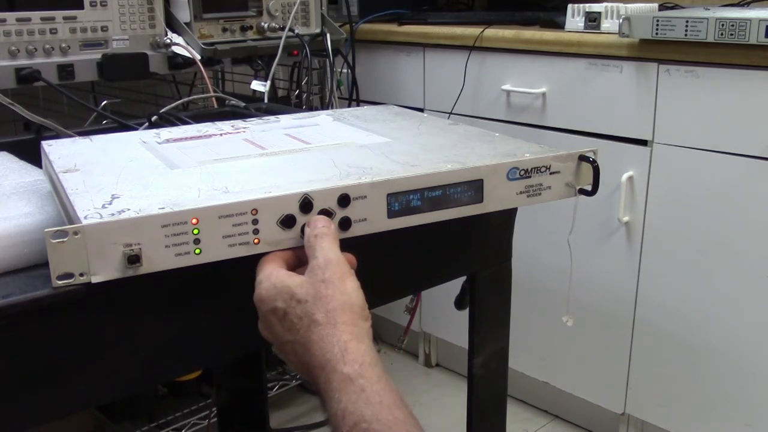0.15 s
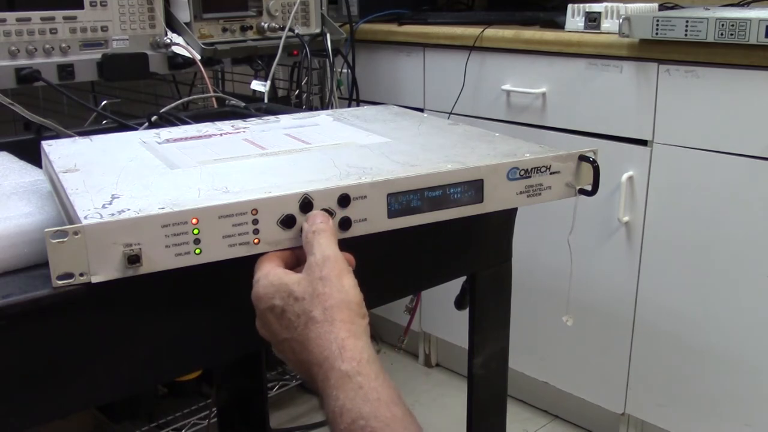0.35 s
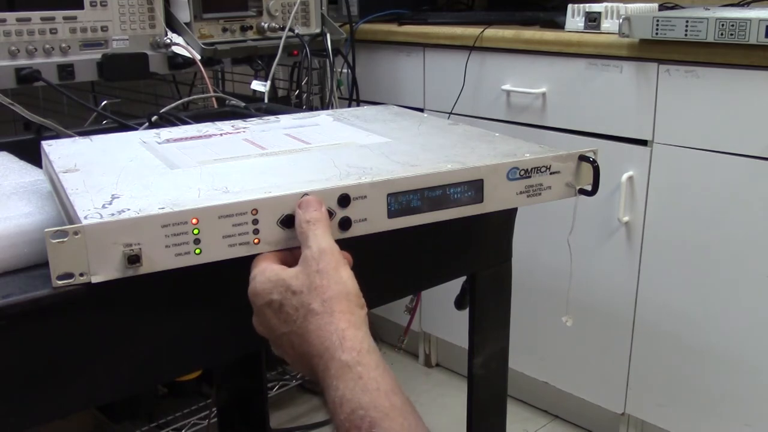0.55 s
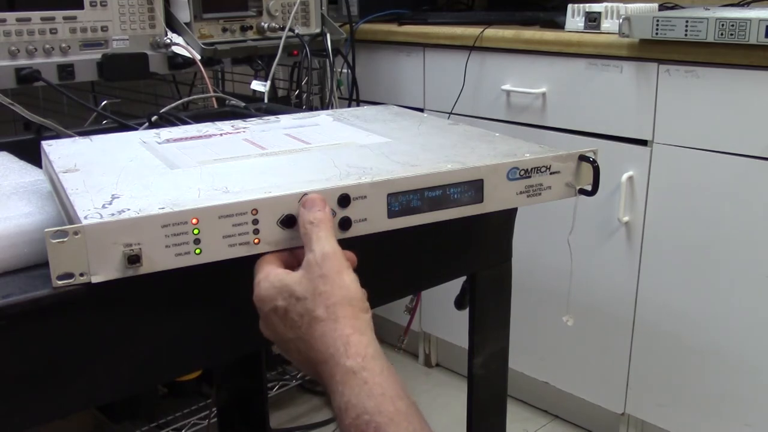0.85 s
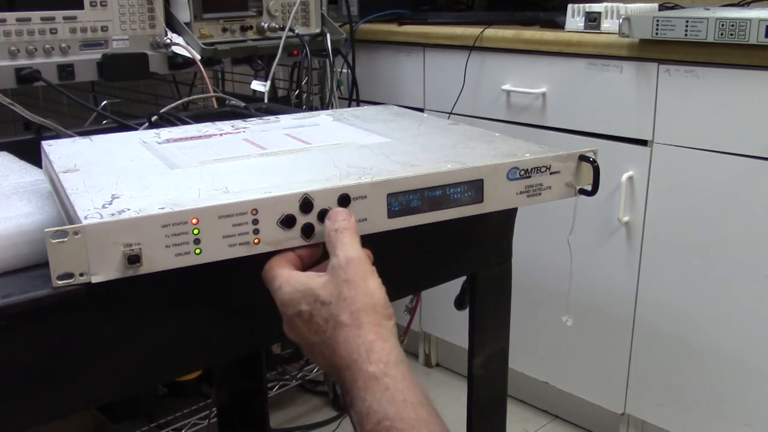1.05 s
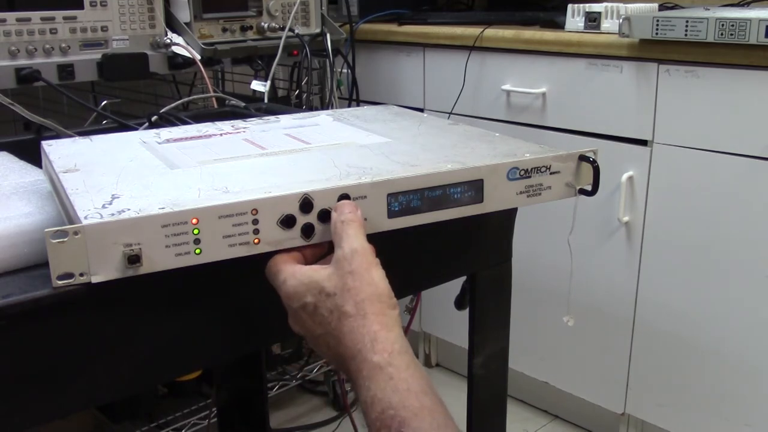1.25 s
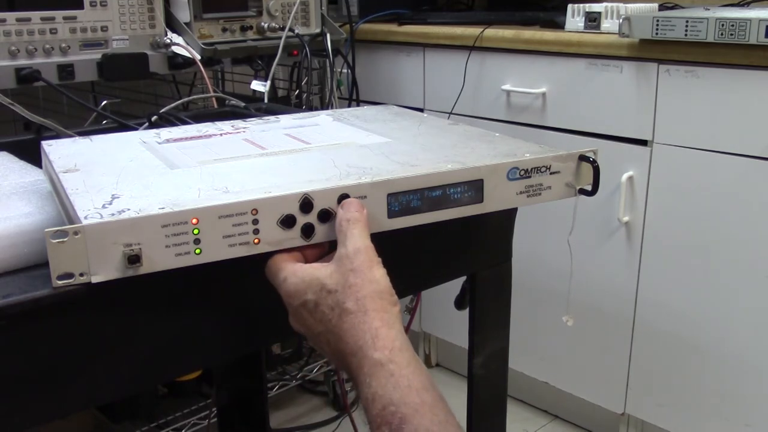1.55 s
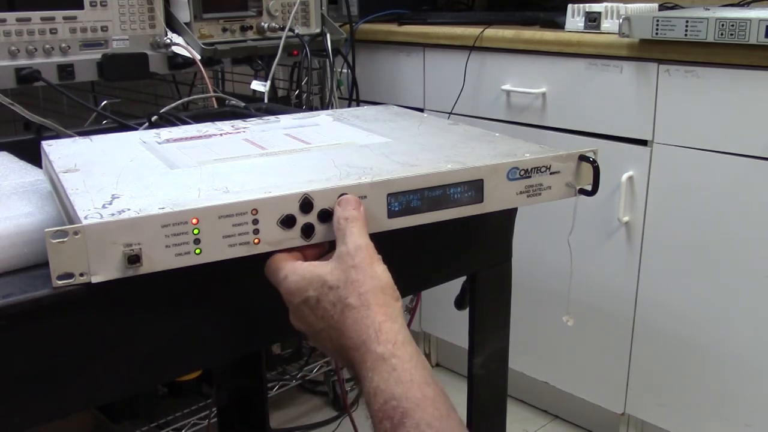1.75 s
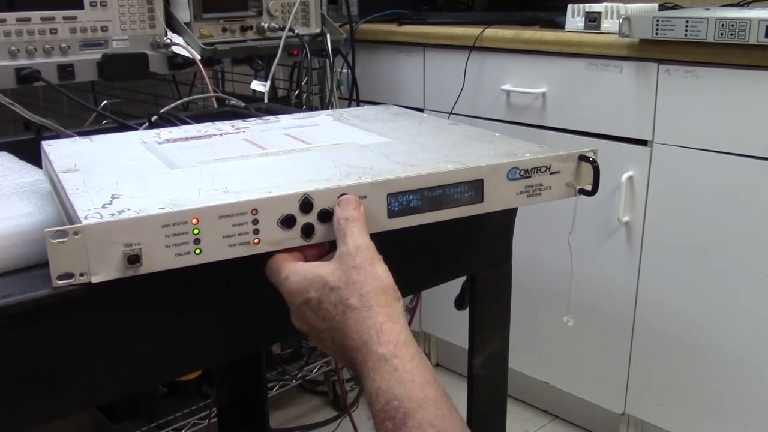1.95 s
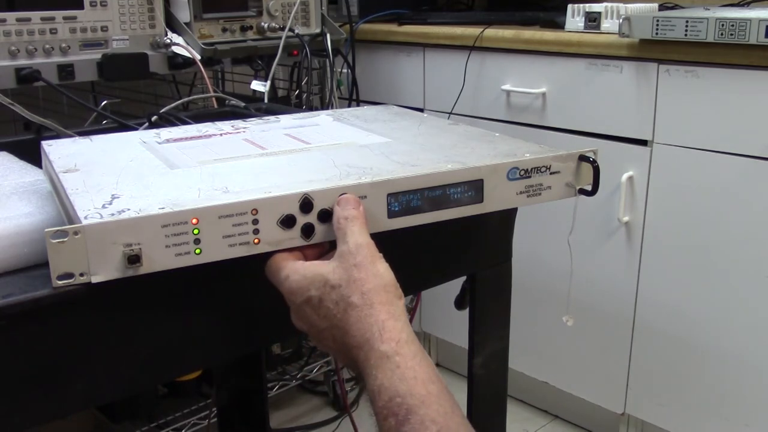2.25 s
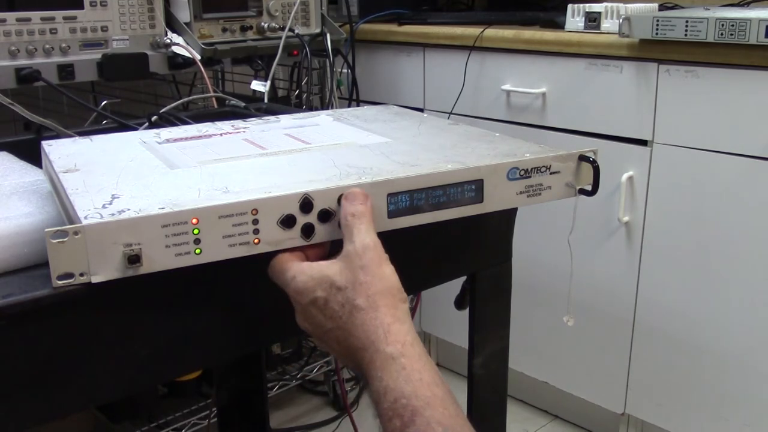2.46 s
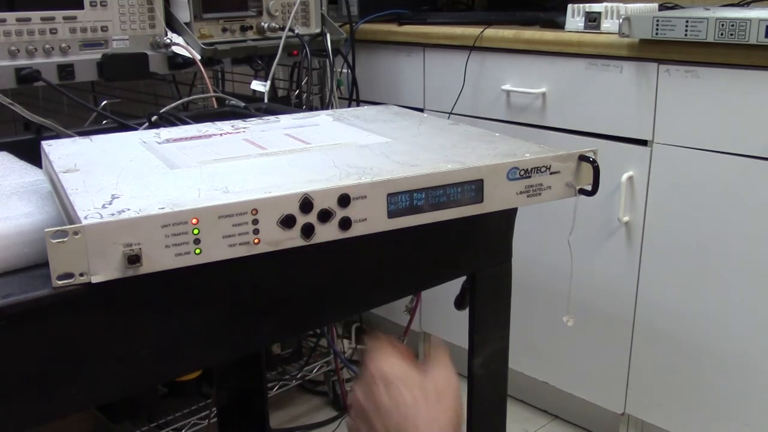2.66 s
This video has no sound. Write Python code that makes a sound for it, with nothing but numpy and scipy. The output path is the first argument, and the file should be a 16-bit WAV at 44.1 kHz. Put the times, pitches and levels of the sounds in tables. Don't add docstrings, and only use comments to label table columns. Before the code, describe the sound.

A rack amplifier's cooling fan runs steadily from 0 to about 2.8 seconds: a dense, buzzy whine, strongest around 800 hertz, its pitch creeping up almost imperceptibly, wrapped in turbulent rushing air coloured by the metal case. Smaller, faster fans sing faintly behind, over a trace of hum. A short dry button click comes at 0.76 seconds, with a faint release at 0.86, and a softer click at 2.36.

```python
import sys
import numpy as np
from scipy import signal
from scipy.fft import rfft, irfft, next_fast_len
from scipy.io import wavfile
from scipy.ndimage import uniform_filter1d

SR = 44100
rng = np.random.default_rng(int(sys.argv[2]) if len(sys.argv) > 2 else 0)


def voltage_ratio(level):
    return 10 ** (np.asarray(level, float) / 20)


def dump_mix(stems):
    frames = np.atleast_2d(stems).T
    limited = np.clip(frames, -1, 1)
    pcm = np.round(limited * 32767).astype(np.int16)
    wavfile.write(sys.argv[1], SR, pcm)


N = 123479

# t/s, speed/(turns per s)
SHAFT_SPEED = [
    (0, 55.23),
    (.45, 55.222),
    (.75, 55.207),
    (1.2, 55.231),
    (1.75, 55.265),
    (2.2, 55.316),
    (2.8, 55.325),
]
# multiple of shaft, first level/dB rms,
# last level/dB rms
BLADE_TONES = [(5, -31.3, -31.3), (10, -38, -37.8), (15, -23.4, -24.3), (20, -47, -46), (25, -34.8, -30.5),
               (30, -30.8, -37.5), (35, -40.3, -41.3), (40, -33.3, -29.5), (45, -50, -45), (50, -43.5, -40),
               (55, -46.5, -50), (60, -60, -53), (75, -64, -62), (65, -52.3, -55.5)]
# multiple of shaft, first level/dB rms, last level/dB rms
SLOT_TONES = [(9, -55.5, -54), (12, -58, -55), (16, -32.4, -32.7), (19, -53.5, -54), (24, -33, -30.4),
              (26, -56, -52), (28, -54.5, -50), (31, -35.6, -37.8), (33, -55, -59), (34, -55, -51),
              (36, -59, -48.5), (38, -52.3, -51.7), (41, -43, -42.5), (46, -44, -46), (51, -63, -60),
              (64, -56.5, -58), (69, -63, -65)]
# multiple of shaft, first level/dB rms, last level/dB rms
OPPOSED_TONES = [
    (39, -47, -47.5),
    (44, -57, -48),
]


def main_fan():
    start_angle, slot_angle = .55, .113
    speed = np.interp(np.arange(N) / SR, *np.transpose(SHAFT_SPEED))
    blade_angle = start_angle + 2 * np.pi * np.cumsum(speed) / SR
    motor_angle = blade_angle + slot_angle
    creep = np.clip((speed - speed[0]) / (speed[-1] - speed[0]), 0, 1)
    blades = tones(blade_angle, BLADE_TONES, creep)
    slots = tones(motor_angle, SLOT_TONES, creep)
    opposed = tones(motor_angle, OPPOSED_TONES, creep)
    return blades + slots - opposed


def tones(angle, rows, creep=0):
    flutter_db, flutter_hz = .4, 3.0
    outlet_order, outlet_turn, outlet_creep = 22, 2.6, .7
    out = np.zeros(N)
    for row in rows:
        order, first_db, last_db = row[0], row[1], row[-1]
        db = first_db + (last_db - first_db) * creep + flutter_db * drift(flutter_hz)
        above = .5 + np.arctan((order - outlet_order) / 2) / np.pi
        turn = (outlet_turn + outlet_creep * creep) * above
        out += np.sqrt(2) * voltage_ratio(db) * np.cos(order * angle + turn)
    return out


def drift(rate_hz):
    r = np.exp(-80 * np.pi * rate_hz / SR)
    noise = rng.standard_normal(N // 40 + 2002)
    slow = signal.lfilter([1], [1, -2 * r, r * r], noise)[2000:]
    return np.interp(np.arange(N) / 40, np.arange(len(slow)), slow / slow.std())


# f/Hz, level/dB per Hz
AIR_SPECTRUM = [(30, -65), (130, -76.5), (240, -65), (1000, -66), (2000, -72), (4200, -79.5), (9000, -91.5),
                (15500, -109)]
# f/Hz, width/Hz, lift/dB
CASE_RESONANCES = [(900, 100, 0), (1050, 49, 2), (1335, 120, 9.5), (1480, 66, -2.5), (1605, 80, 4.5),
                   (1770, 100, -0.5), (1900, 100, 0), (2040, 80, -1.5), (2207, 280, 6), (2340, 80, 2),
                   (2530, 100, 5), (3050, 250, 2.5), (3700, 400, 0), (5430, 930, 5), (7140, 2500, 6.5),
                   (11830, 2100, 6.5)]


def air():
    ripple_db, ripple_hz = 1.1, 30
    gust_db, gust_hz = .25, 3.0
    size = next_fast_len(N)
    hz = np.maximum(np.arange(size // 2 + 1) * SR / size, 1)
    air_hz, air_db = np.transpose(AIR_SPECTRUM)
    db = np.interp(np.log(hz), np.log(air_hz), air_db)
    for centre_hz, width_hz, lift_db in CASE_RESONANCES:
        db = db + lift_db / (1 + (2 * (hz - centre_hz) / width_hz) ** 2)
    ripple = uniform_filter1d(rng.standard_normal(len(hz)), size=int(ripple_hz * size / SR))
    db = db + ripple_db * ripple / ripple.std()
    noise = rfft(rng.standard_normal(size))
    rush = irfft(noise * voltage_ratio(db) * np.sqrt(SR / 2), size)[:N]
    return rush * voltage_ratio(gust_db * drift(gust_hz))


# t/s, peak level/dB, cap pitch f/Hz, decay t60/s
CLICKS = [
    (.7597, -19.5, 5400, .0025),
    (.7609, -24, 3900, .004),
    (.7765, -33, 4000, .005),
    (.8595, -37, 6000, .004),
    (2.3569, -21.5, 4900, .004),
    (2.3586, -29, 6900, .004),
    (2.3617, -29, 3600, .006),
]
# f/Hz, level/dB, decay t60/s
PANEL = [
    (12700, -25, .004),
]


def button():
    rattle_db, rattle_t60 = -18, .04
    band = signal.butter(2, [3000, 6500], "band", fs=SR, output="sos")
    rattle = signal.sosfilt(band, rng.standard_normal(N))
    out = np.zeros(N)
    for s, db, cap_hz, cap_t60 in CLICKS:
        out += ring(s, db, cap_hz, cap_t60)
        rattle_gain, _ = struck(s, db + rattle_db, rattle_t60)
        out += rattle_gain * rattle
        for panel_hz, panel_db, panel_t60 in PANEL:
            out += ring(s, db + panel_db, panel_hz, panel_t60)
    return out


def ring(s, db, hz, t60):
    gain, age = struck(s, db, t60)
    return gain * np.sin(2 * np.pi * hz * age)


def struck(s, db, t60):
    rise_s = .00015
    age = np.maximum(np.arange(N) / SR - s, 0)
    rise = (1 - np.exp(-age / rise_s)) ** 2
    return voltage_ratio(db - 60 * age / t60) * rise * 2, age


# multiple of shaft, level/dB rms
SMALL_TONES_A = [(1, -48.5), (4, -56), (5, -44), (10, -54), (16, -55), (25, -66), (30, -62), (55, -80),
                 (75, -90)]
SMALL_TONES_B = [(1, -52), (5, -43), (10, -62), (16, -58), (30, -67), (35, -66), (40, -67), (80, -93)]
SMALL_SPEEDS = [186.91, 192.42]
SMALL_ANGLES = [1.4, 2.7]


def small_fans():
    wander, wander_hz = .05, 3.1
    hum_hz, hum_db = 118.7, -56.5
    turn = 2 * np.pi * np.arange(N) / SR
    out = voltage_ratio(hum_db) * np.sqrt(2) * np.sin(hum_hz * turn)
    for speed, start, rows in zip(SMALL_SPEEDS, SMALL_ANGLES, [SMALL_TONES_A, SMALL_TONES_B]):
        angle = start + speed * turn + wander * drift(wander_hz)
        out += tones(angle, rows)
    return out


def scene():
    mix = main_fan() + air() + button() + small_fans()
    return mix[None]


def roll_off(x):
    return signal.sosfilt(signal.butter(12, 15730, fs=SR, output="sos"), x)


def record(dry):
    fade_s = .0006
    time_left = np.arange(N)[::-1] / SR
    fade = np.sin(np.pi / 2 * np.minimum(time_left / fade_s, 1)) ** 2
    return roll_off(dry * fade)


dry = scene()
out = record(dry)
dump_mix(out)
```